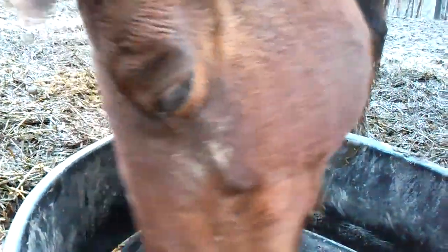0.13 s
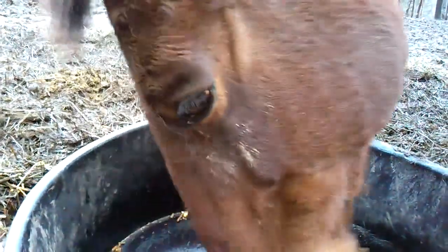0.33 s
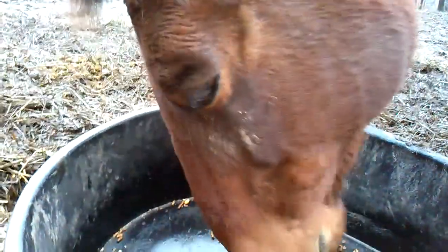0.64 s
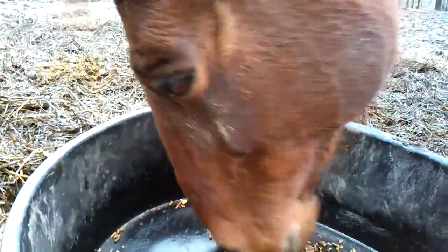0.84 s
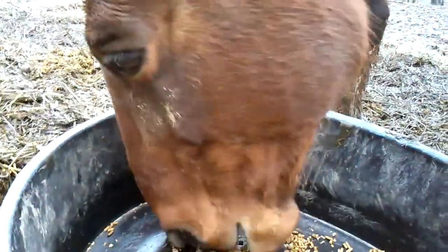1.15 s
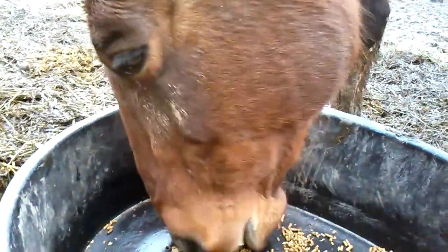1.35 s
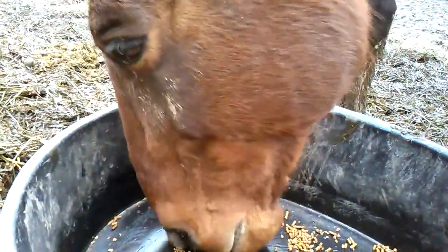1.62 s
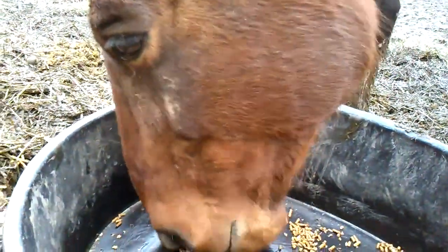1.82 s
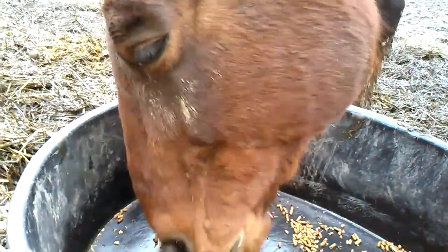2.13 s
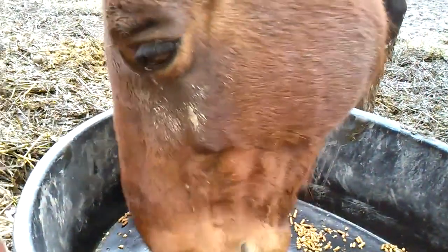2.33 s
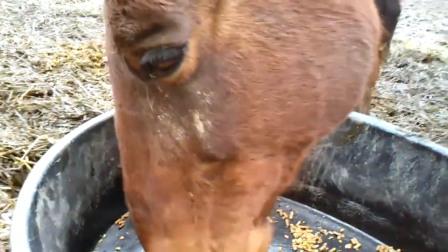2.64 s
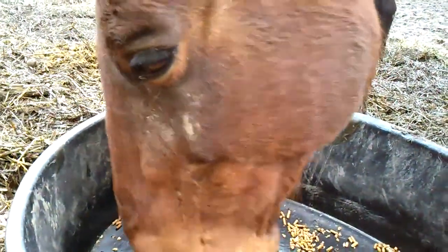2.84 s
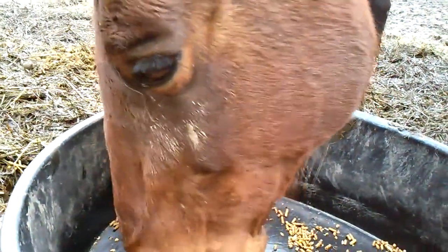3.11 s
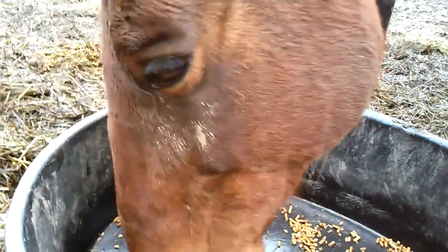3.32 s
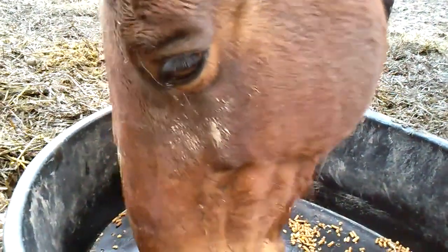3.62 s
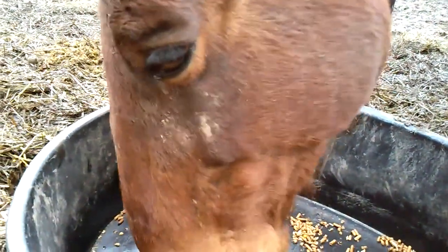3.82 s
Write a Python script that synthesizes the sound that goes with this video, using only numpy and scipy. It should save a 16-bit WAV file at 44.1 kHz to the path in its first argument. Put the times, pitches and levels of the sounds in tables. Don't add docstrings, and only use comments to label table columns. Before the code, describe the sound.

A horse's muzzle stirs dry feed pellets in a plastic tub: an early burst of rattling with one sharp double knock, then scattered knocks, ticks and scrapes. Outdoors, close microphone, faint air hiss.

```python
import sys
import numpy as np
from scipy import signal
from scipy.fft import rfft, irfft
from scipy.io import wavfile
from scipy.ndimage import uniform_filter1d

SR = 44100
rng = np.random.default_rng(int(sys.argv[2]) if len(sys.argv) > 2 else 0)


def ratio_of_db(decibels):
    return 10 ** (np.asarray(decibels, float) / 20)


def unload_audio(sound):
    columns = np.transpose(np.atleast_2d(sound))
    steps = np.round(np.clip(columns, -1, 1) * 32767)
    wavfile.write(sys.argv[1], SR, steps.astype(np.int16))


N = 174195


def rms_one(x):
    return x / np.sqrt(np.mean(x ** 2) + 1e-20)


def in_time(rows):
    time_s, *columns = np.transpose(rows)
    return [np.interp(np.arange(N) / SR, time_s, column) for column in columns]


def at_hz(points, hz):
    table = np.array(points)
    return np.interp(np.log(hz), np.log(table[:, 0]), table[:, 1])


def drift(rate_hz):
    pole = np.exp(-80 * np.pi * rate_hz / SR)
    noise = rng.standard_normal(N // 40 + 2002)
    slow = signal.lfilter([1], [1, -2 * pole, pole * pole], noise)[2000:]
    return np.interp(np.arange(N) / 40, np.arange(len(slow)), rms_one(slow))


def ring(clicks, hz, t60_s):
    pole = ratio_of_db(-60 / (t60_s * SR))
    angle = 2 * np.pi * min(hz, .45 * SR) / SR
    return signal.lfilter([.5, 0, -.5], [1, -2 * pole * np.cos(angle), pole * pole], clicks + 1e-18)


def contacts(per_s, uneven_db, clump_db, clump_rate_hz):
    sizes = ratio_of_db(uneven_db * np.minimum(rng.exponential(1, N), 4)) * rng.choice([-1, 1], N)
    return sizes * (rng.random(N) < per_s * ratio_of_db(clump_db * drift(clump_rate_hz)) / SR)


def grains(colour, per_s, cycles, uneven_db, clump_db, clump_rate_hz, count):
    clicks = contacts(per_s, uneven_db, clump_db, clump_rate_hz)
    dealt = rng.integers(0, count, (2, N))
    pitches_hz = np.geomspace(colour[0][0], colour[-1][0], count)
    total = 0
    for k, hz in enumerate(pitches_hz):
        struck = clicks * (dealt == k).any(0)
        total = total + ratio_of_db(at_hz(colour, hz)) * np.sqrt(hz) * ring(struck, hz, cycles / hz)
    edges_hz = [pitches_hz[0] * .9, pitches_hz[-1] * .95]
    return rms_one(signal.sosfilt(signal.butter(3, edges_hz, "band", fs=SR, output="sos"), total))


def hits(rows, cycles, burst_s, spread, side_db, trim_db):
    out, t = np.zeros(N + 4096), np.arange(4096) / SR
    for start_s, peak_db, hz in rows:
        crunch, chance = rng.standard_normal(4096), rng.standard_normal(8)
        force = crunch * t * np.exp(-t / burst_s)
        sound = 0
        for k, step in enumerate((-2, -1, 1, 2, 0)):
            near_hz = hz * np.exp(spread * step * (1 + 0.22 * chance[k]))
            tone = ring(force, near_hz, cycles / near_hz)
            tone_db = (side_db + 2 * chance[k + 3]) * abs(step) ** .5
            sound = sound + ratio_of_db(tone_db) * tone / np.abs(tone).max()
        sound = signal.sosfilt(signal.butter(2, min(1.9 * hz, 19000), fs=SR, output="sos"), sound)
        i = int(start_s * SR)
        out[i:i + 4096] += ratio_of_db(peak_db + trim_db) * sound / np.abs(sound).max()
    return out[:N]


def swell(start_s, length_s, rise_s, fall_s):
    t = np.arange(N) / SR - start_s
    return np.clip(t / rise_s, 0, 1) * np.exp(-np.maximum(t - length_s, 0) / fall_s)


def rubbing(rows, per_s, cycles, rise_s, fall_s):
    out = np.zeros(N)
    slips = contacts(per_s, uneven_db=1.0, clump_db=1.56, clump_rate_hz=47)
    for start_s, length_s, level_db, hz in rows:
        a = max(int((start_s - .05) * SR), 0)
        b = int((start_s + length_s + .1) * SR)
        body = ring(ring(slips[a:b], hz * .97, cycles / hz), hz * 0.98, cycles / hz)
        power = uniform_filter1d(rms_one(body) ** 2, int(4 * SR / hz))
        body = body / (power + .05) ** .3
        out[a:b] += ratio_of_db(level_db) * rms_one(body) * swell(start_s, length_s, rise_s, fall_s)[a:b]
    return out


# pitch_hz, density_db_per_hz
AIR_COLOUR = [(30, -12), (50, 3.5), (120, 3.5), (300, 2.5), (900, 2), (2500, -7.5), (7000, -13.5),
              (16000, -32)]


def air():
    hz = np.maximum(np.fft.rfftfreq(N, 1 / SR), 1)
    spectrum = rfft(rng.standard_normal(N)) * ratio_of_db(at_hz(AIR_COLOUR, hz))
    return ratio_of_db(-48) * rms_one(irfft(spectrum, N))


# time_s, pitch_hz, level_db
SQUEAK_GLIDE = [
    (2.44, 8250, -63),
    (2.59, 9200, -61),
    (2.63, 9950, -57),
    (2.64, 9200, -80),
    (2.67, 8700, -62),
    (2.72, 8080, -56),
    (2.765, 8020, -48),
    (2.81, 8000, -66),
]


def squeak():
    hz, level_db = in_time(SQUEAK_GLIDE)
    t = np.arange(N) / SR
    on = (t > SQUEAK_GLIDE[0][0]) & (t < SQUEAK_GLIDE[-1][0])
    level = ratio_of_db(level_db + 3 + 3.5 * drift(40))
    return on * level * np.sin(2 * np.pi * np.cumsum(hz + 20 * drift(80)) / SR)


# pitch_hz, level_db, t60_s
FLOOR_MODES = [(132.4, 1.5, 0.056), (190.8, 1.5, 0.11), (250, 5, 0.1), (324, 1, 0.12)]
# start_s, length_s, level_db, pitch_hz
FLOOR_RUBS = [(.17, 0.014, -39.5, 258), (.4, 0.12, -41.5, 250), (.754, 0.02, -33.5, 187),
              (.83, 0.15, -41, 221), (.965, 0.054, -37, 201), (1.4, 0.057, -42.5, 197),
              (1.572, 0.031, -33, 261), (1.79, 0.088, -37, 225), (2.03, 0.027, -43, 214),
              (2.415, 0.016, -37.5, 323), (2.61, 0.17, -44, 203), (3.002, 0.033, -31.5, 311),
              (3.14, 0.097, -46, 264), (3.445, 0.04, -36, 198), (3.84, 0.025, -43, 250)]


def tub_floor():
    clicks = contacts(per_s=310, uneven_db=4.0, clump_db=1.5, clump_rate_hz=7.9)
    slips = signal.lfilter([1], [1, -.95], clicks)
    boom = 0
    for k, (hz, level_db, t60_s) in enumerate(FLOOR_MODES):
        boom = boom + ratio_of_db(level_db) * (-1) ** k * ring(slips, hz, t60_s)
    rubs = rubbing(FLOOR_RUBS, per_s=1000, cycles=6.26, rise_s=0.0076, fall_s=0.019)
    return ratio_of_db(-49) * rms_one(boom) + rubs


# start_s, length_s, level_db, pitch_hz
WALL_SCRAPES = [(.33, .055, -36.5, 3780), (.444, 0.01, -22, 2390), (0.55, 0.015, -44, 1540),
                (.948, .012, -36.5, 1530), (1.175, 0.051, -36.5, 1850), (1.16, 0.076, -37.5, 3700),
                (1.735, 0.08, -40, 1660), (1.785, 0.029, -34, 4300), (2.405, 0.028, -40, 3600),
                (2.77, 0.05, -40, 608), (3.03, 0.105, -40.5, 520), (3.004, 0.05, -38.5, 3488),
                (3, 0.093, -33, 846), (3.44, 0.042, -39.5, 870)]


def scrapes():
    return rubbing(WALL_SCRAPES, per_s=680, cycles=9.2, rise_s=0.0043, fall_s=0.0099)


def dust(stir_db):
    ticks = contacts(per_s=420, uneven_db=2.8, clump_db=2.2, clump_rate_hz=30)
    puff = signal.lfilter([1], [1, -.96], np.abs(ticks)) * rng.standard_normal(N)
    both = ratio_of_db(-46.5) * rms_one(puff) + ratio_of_db(-50.5) * rng.standard_normal(N)
    bright = signal.sosfilt(signal.butter(2, 6600, "high", fs=SR, output="sos"), both)
    follow = .55
    return ratio_of_db(follow * (stir_db - stir_db.mean())) * bright


# start_s, peak_db, pitch_hz
BRIGHT_SNAPS = [
    (.128, -29, 8400),
    (.4275, -24, 8500),
    (.446, -21, 10700),
    (.876, -26, 14500),
    (1.366, -30, 9000),
    (1.9915, -16, 12400),
    (2.142, -30, 9200),
]


def snaps():
    return hits(BRIGHT_SNAPS, cycles=24, burst_s=.00025, spread=.1, side_db=-3, trim_db=0)


# start_s, peak_db, pitch_hz
LOOSE_CLICKS = [(0.033, -27.5, 4300), (0.1271, -30, 5900), (0.1462, -25, 5600), (0.2374, -25.5, 6450),
                (0.296, -25.5, 3280), (0.3514, -19, 3500), (0.5445, -27, 5860), (0.6052, -24.5, 5470),
                (0.7555, -36, 4400), (0.8056, -29.5, 5890), (1.1673, -22, 3900), (1.312, -29, 6800),
                (1.4356, -39, 3030), (1.5664, -30, 4400), (1.6524, -28, 3920), (1.6892, -23.5, 4070),
                (1.701, -29, 6400), (1.745, -25, 4320), (1.864, -26, 5920), (1.8944, -28, 6200),
                (1.993, -30, 6300), (2.1221, -33, 5910), (2.163, -29, 3600), (2.2144, -28.5, 5630),
                (2.2533, -29, 3700), (2.3313, -30, 6650), (2.56, -34, 3430), (2.577, -28, 6170),
                (2.6394, -23.5, 3360), (2.65, -31, 4620), (2.671, -41, 3680), (2.7848, -23.5, 4300),
                (2.8774, -31, 5680), (3.0117, -25.5, 3000), (3.359, -28, 4230), (3.3767, -31, 3760),
                (3.4398, -26.5, 6810), (3.531, -28.5, 6730), (3.5715, -28.5, 5520), (3.7813, -26, 4500)]


def clicks_of_loose_pellets():
    return hits(LOOSE_CLICKS, cycles=36, burst_s=.0006, spread=.12, side_db=-9, trim_db=0)


# start_s, peak_db, pitch_hz
PELLET_TICKS = [(0.3356, -20, 3920), (0.4133, -26, 4320), (0.4276, -15, 5120), (0.4462, -13, 4330),
                (0.4925, -23.5, 5730), (0.9397, -33, 5540), (1.1019, -28.5, 4030), (1.1397, -30, 2660),
                (1.2212, -30, 3570), (1.478, -27, 4650), (1.737, -25, 3500), (1.7767, -27.5, 4200),
                (1.794, -15.5, 4350), (2.5234, -28, 3840), (2.9552, -24.5, 2670), (3.036, -20, 3450),
                (3.1025, -25, 4160), (3.6727, -22, 5500)]


def ticks_of_pellets():
    return hits(PELLET_TICKS, cycles=36, burst_s=.0008, spread=.15, side_db=-8, trim_db=3)


# time_s, shove_db, stir_db
MUZZLE_EFFORT = [(0, -47.5, -58.5), (.2, -52, -52.5), (.5, -37.5, -43.5), (.73, -46.5, -50),
                 (.92, -46.5, -52), (1.3, -41.5, -47.5), (1.9, -45.5, -46), (2.19, -39.5, -43.5),
                 (2.53, -49, -45), (2.87, -42.5, -45.5), (3.15, -41.5, -46), (3.53, -44, -46),
                 (3.7, -53, -44.5), (3.95, -48, -46.5)]
# start_s, length_s, shove_db, stir_db
LIP_SCOOPS = [(0.117, 0.059, -43, -45.5), (0.219, 0.12, -38.5, -46.5), (0.324, 0.15, -30.5, -41),
              (0.477, 0.035, -36, -56), (1.098, 0.14, -41, -42), (1.674, 0.034, -45, -42),
              (1.727, .11, -37.5, -46), (2.393, .07, -42.5, -45.5), (2.62, 0.061, -40, -41),
              (2.962, 0.21, -42, -46), (3.329, 0.14, -44.5, -59), (3.615, 0.082, -41.5, -49)]


def muzzle_effort():
    levels_db = []
    for column, base_db in enumerate(in_time(MUZZLE_EFFORT), start=2):
        power = ratio_of_db(base_db) ** 2
        for row in LIP_SCOOPS:
            envelope = swell(row[0], row[1], rise_s=0.013, fall_s=0.0026)
            power = power + (ratio_of_db(row[column]) * envelope) ** 2
        levels_db.append(10 * np.log10(power))
    return levels_db


# pitch_hz, density_db_per_hz
LOOSE_COLOUR = [(2400, -12), (3000, -10), (3500, -10), (4200, -1), (4900, -14.5), (5600, -6), (6700, -1),
                (7600, -13.5)]


def rattle(stir_db):
    return ratio_of_db(stir_db) * grains(LOOSE_COLOUR, per_s=1600, cycles=34, uneven_db=3.2, clump_db=2.5,
                                 clump_rate_hz=35, count=44)


# pitch_hz, density_db_per_hz
SHOVED_COLOUR = [(380, -4), (480, 5), (660, 1.5), (1000, 5.5), (1400, 0.5), (1900, 8.5), (2400, -54.5)]


def shove(shove_db):
    return ratio_of_db(shove_db) * grains(SHOVED_COLOUR, per_s=900, cycles=15, uneven_db=3.0, clump_db=2.2,
                                  clump_rate_hz=35, count=32)


# start_s,
# peak_db, pitch_hz
TUB_KNOCKS = [(0.051, -32, 550), (0.238, -25, 950), (0.296, -20, 696), (0.43, -7, 1880), (0.445, -9, 1880),
              (0.611, -16, 990), (0.677, -17.5, 815), (0.729, -20, 1470), (0.938, -29, 1540),
              (0.985, -18.5, 627), (1.039, -26.5, 604), (1.138, -19, 1600), (1.231, -12.5, 1810),
              (1.367, -8, 750), (1.435, -19, 1820), (1.58, -24.5, 570), (1.793, -17.5, 1810),
              (2.16, -17.5, 1060), (2.265, -22.5, 1720), (2.523, -21, 1150), (2.638, -12, 837),
              (2.66, -16, 1110), (2.955, -14.5, 1150), (2.975, -19.5, 1040), (3.014, -26, 970),
              (3.034, -12.5, 876), (3.676, -17.5, 880),
              (0.127, -25, 990), (0.279, -22.5, 940), (0.331, -25, 580), (0.366, -17, 1120),
            (0.376, -17, 664), (0.394, -19, 683), (0.413, -13, 1940), (0.451, -22.5, 570),
            (0.484, -22, 1030), (0.838, -34, 966), (0.89, -24.5, 1740), (0.952, -18, 1550),
            (1.178, -20, 1850), (1.337, -37, 746), (1.466, -33, 650), (1.733, -19, 1110),
            (1.749, -26, 1610), (1.766, -30, 1550), (1.815, -20, 1630), (1.955, -27.5, 855),
            (2.038, -25, 1550), (2.066, -29, 1320), (2.132, -31, 770), (2.286, -23, 500),
            (2.559, -25, 1330), (2.631, -20.5, 664), (2.776, -30, 584), (2.789, -22.5, 1190),
            (2.921, -21.5, 1280), (3.13, -26, 807), (3.177, -22.5, 924), (3.295, -28, 1020),
            (3.337, -25, 934), (3.376, -21.5, 1950), (3.61, -25.5, 1000), (3.646, -25, 883)]


def knocks():
    return hits(TUB_KNOCKS, cycles=25.0, burst_s=0.00063, spread=0.284, side_db=-12.5, trim_db=-3.5)


def scene():
    shove_db, stir_db = muzzle_effort()
    near = shove(shove_db) + rattle(stir_db) + dust(stir_db) + scrapes()
    near = near + knocks() + ticks_of_pellets() + clicks_of_loose_pellets() + snaps()
    walls = 0
    for delay_s, level_db in ((.0017, -48), (.0031, -17.5), (.0054, -16.5)):
        walls = walls + ratio_of_db(level_db) * np.roll(near, int(delay_s * SR))
    return (near + walls + tub_floor() + squeak() + air())[None]


def band_limit(x):
    return signal.sosfilt(signal.butter(12, 16850, fs=SR, output="sos"), x)


def record(dry):
    x = signal.sosfilt(signal.butter(2, 45, "high", fs=SR, output="sos"), dry)
    x = signal.sosfilt(signal.cheby2(20, 28, 15950, fs=SR, output="sos"), x)
    return band_limit(x)


dry = scene()
out = record(dry)
unload_audio(out)
```